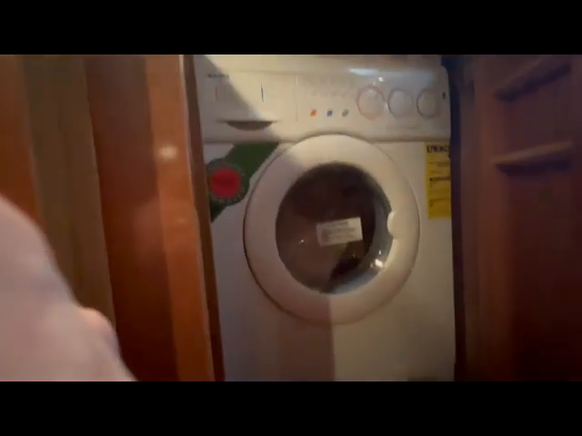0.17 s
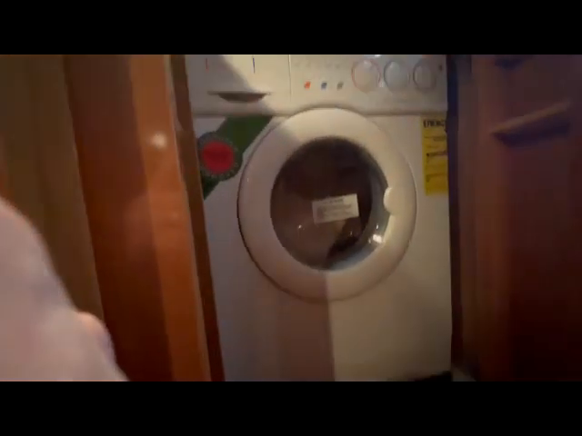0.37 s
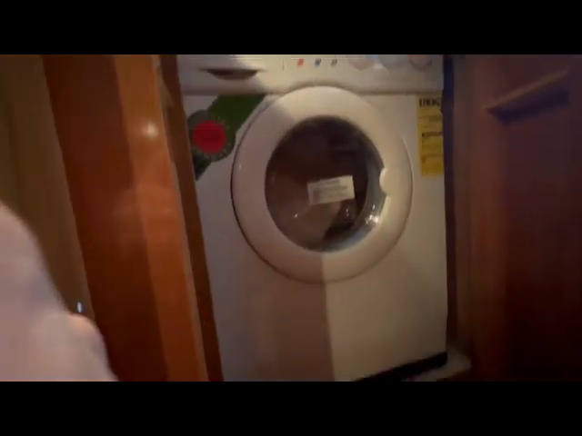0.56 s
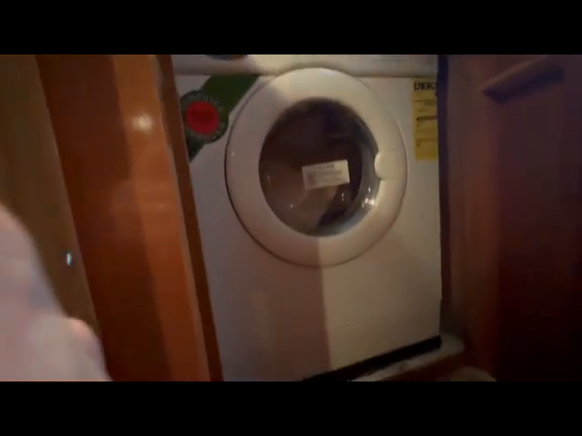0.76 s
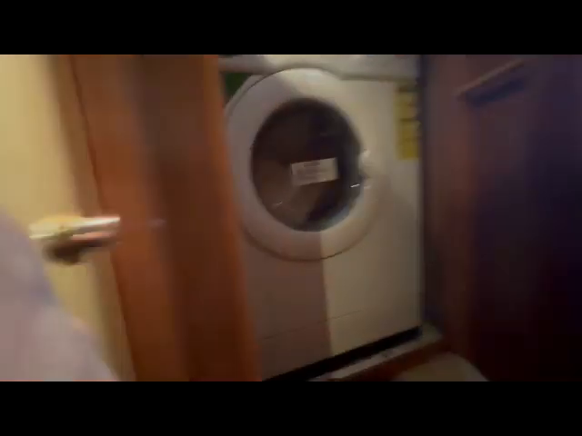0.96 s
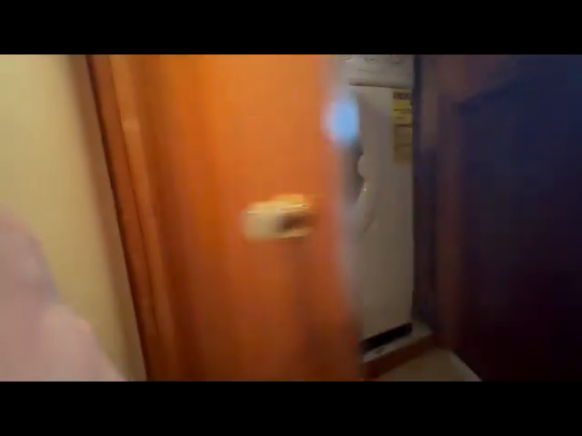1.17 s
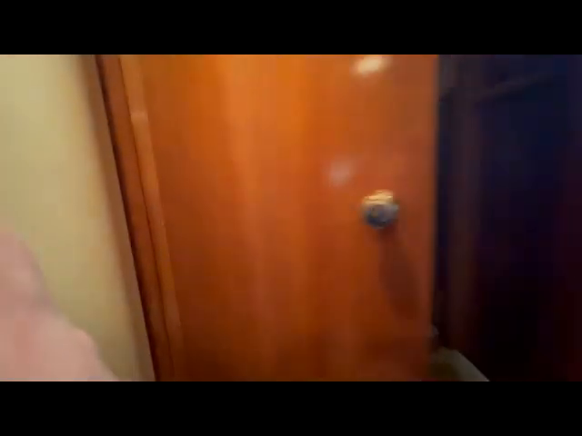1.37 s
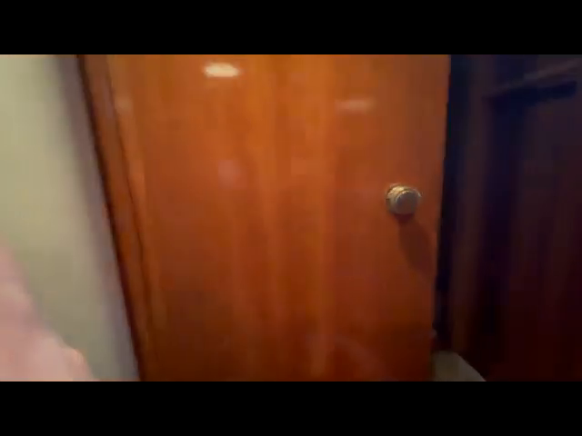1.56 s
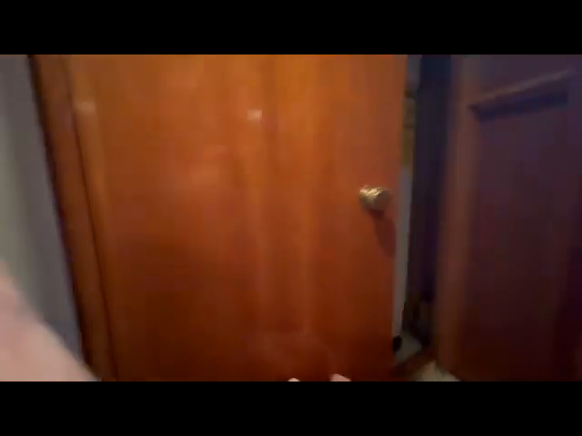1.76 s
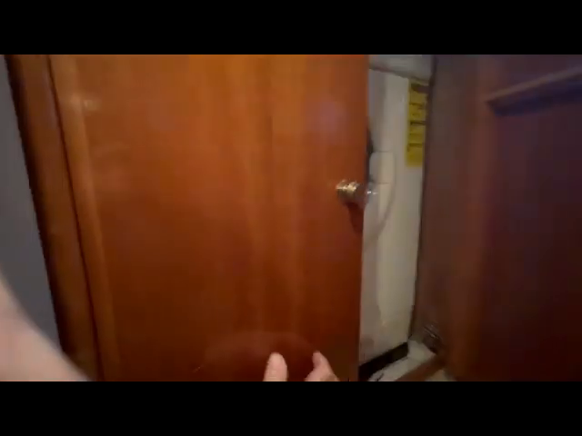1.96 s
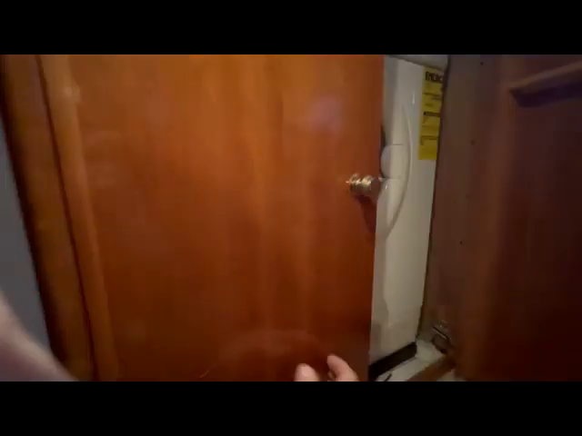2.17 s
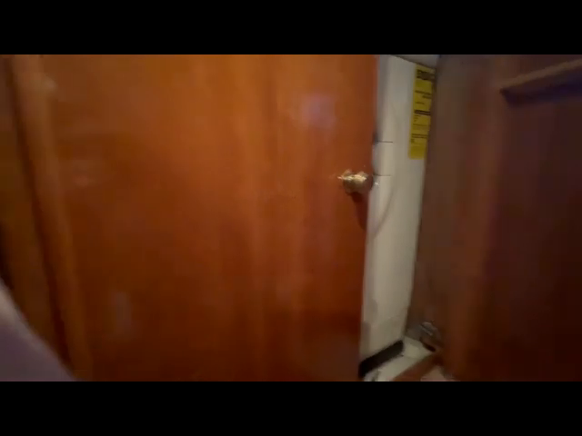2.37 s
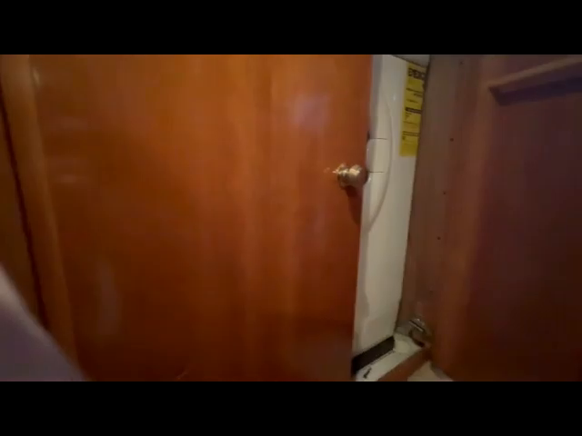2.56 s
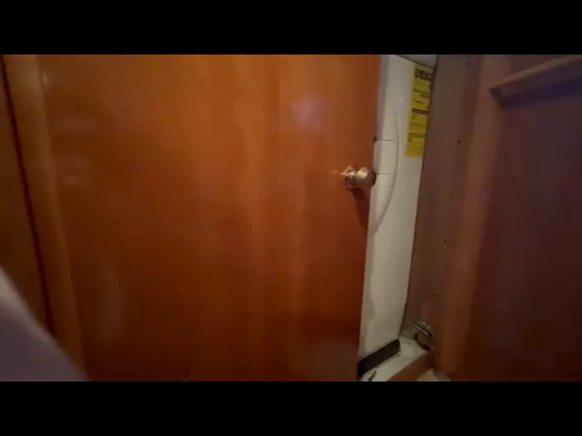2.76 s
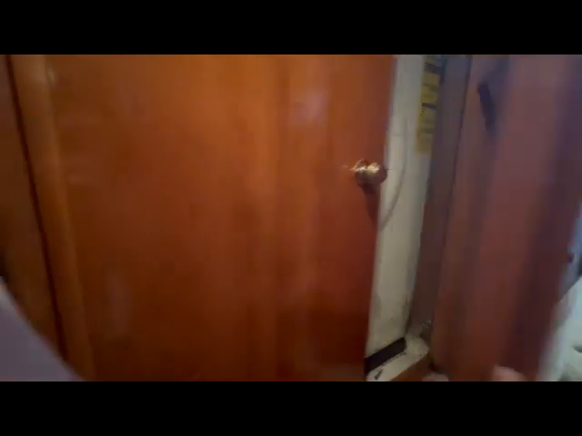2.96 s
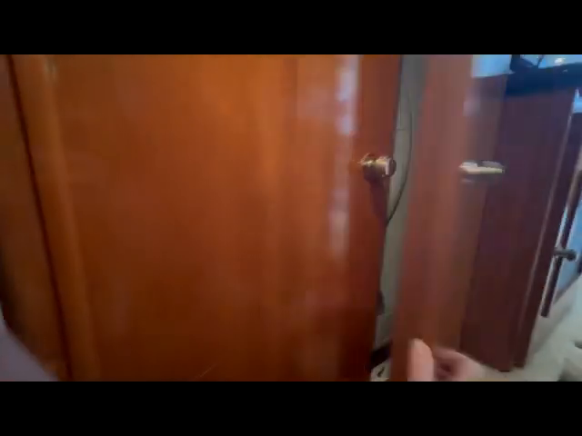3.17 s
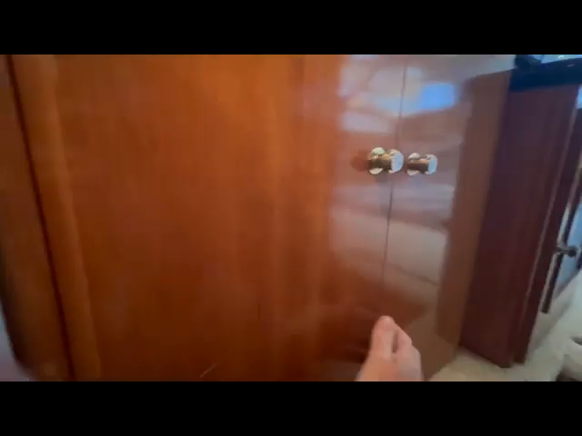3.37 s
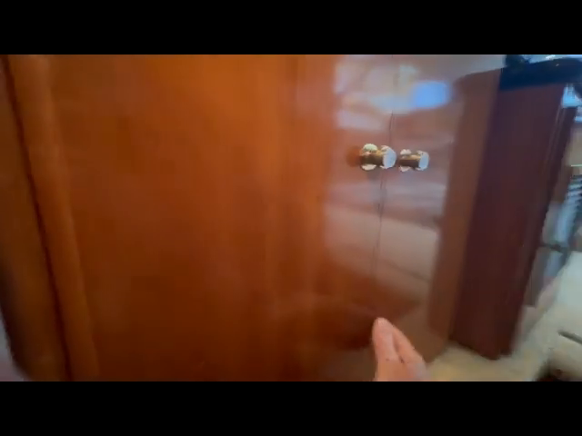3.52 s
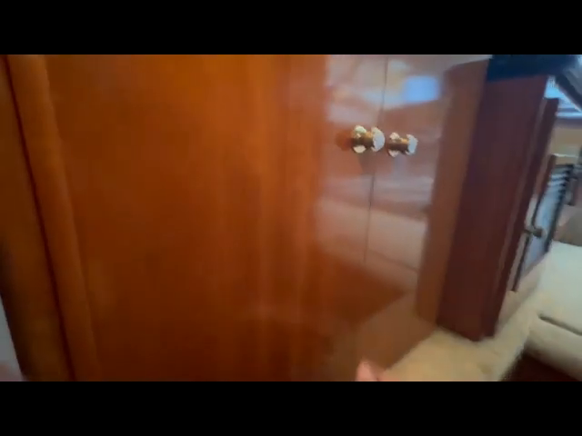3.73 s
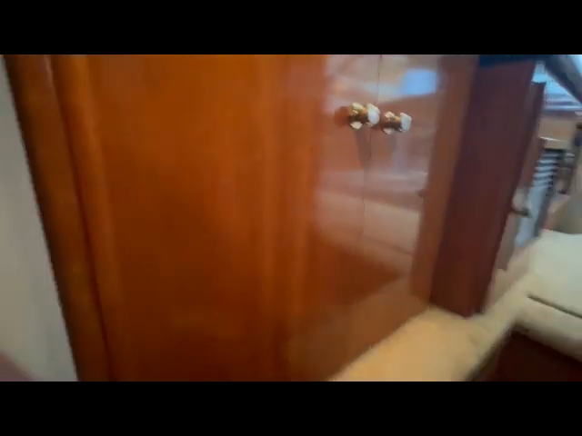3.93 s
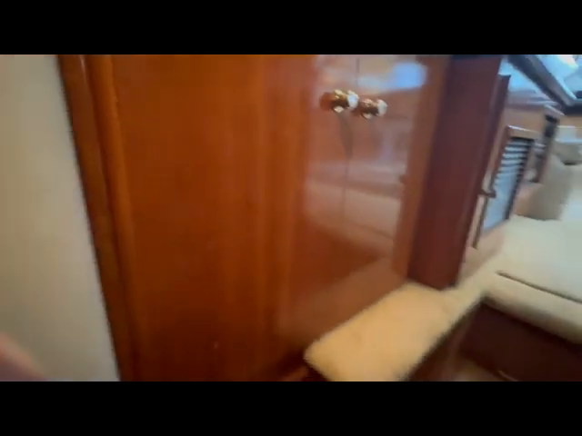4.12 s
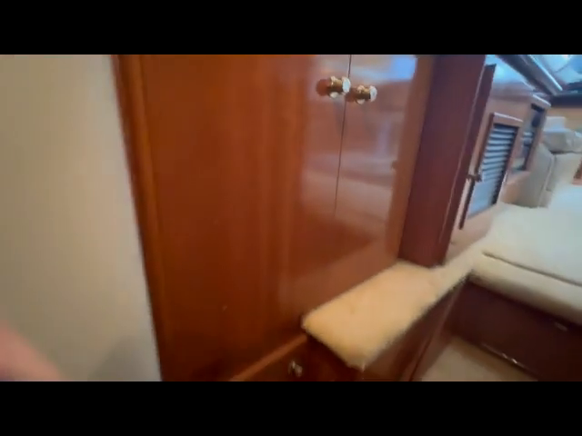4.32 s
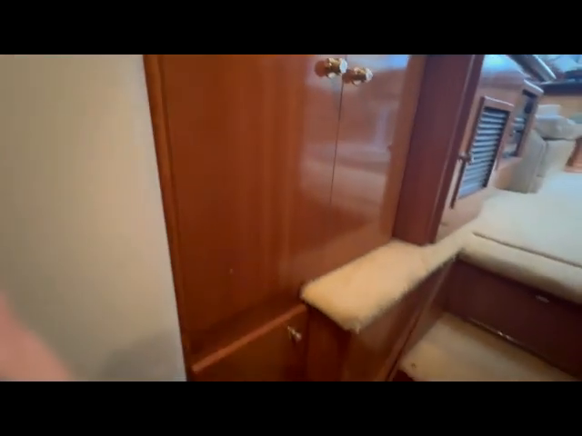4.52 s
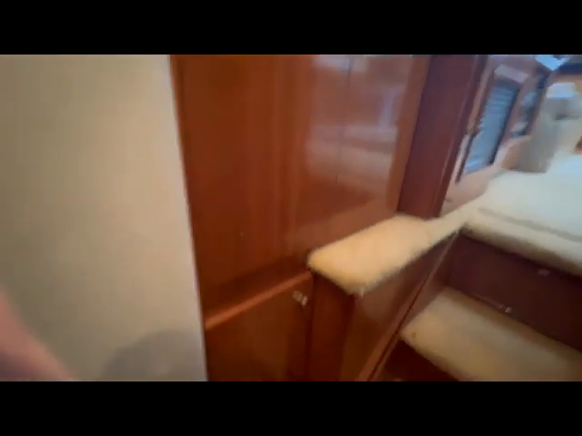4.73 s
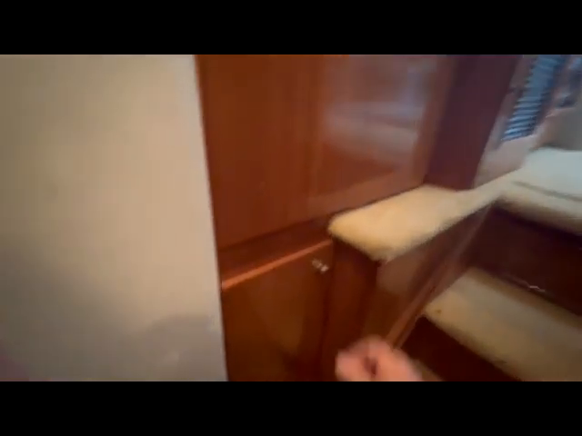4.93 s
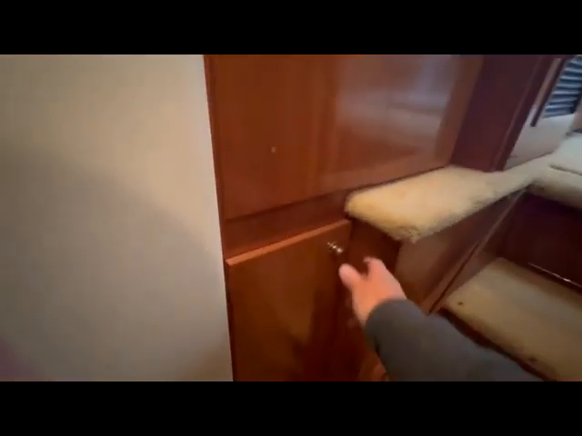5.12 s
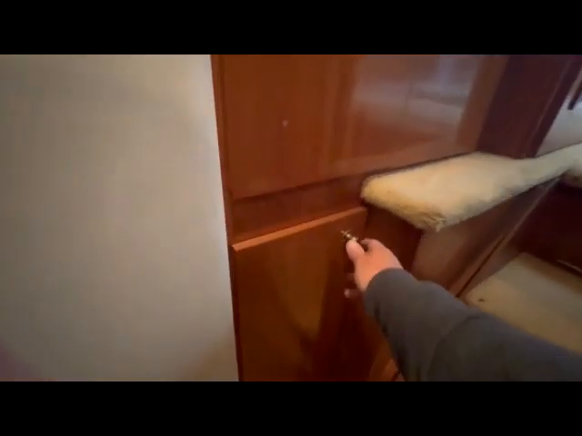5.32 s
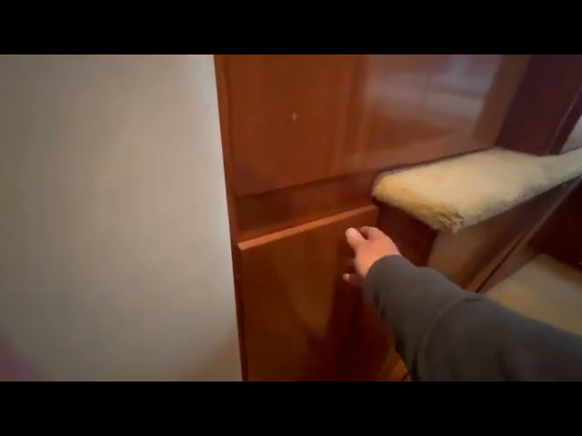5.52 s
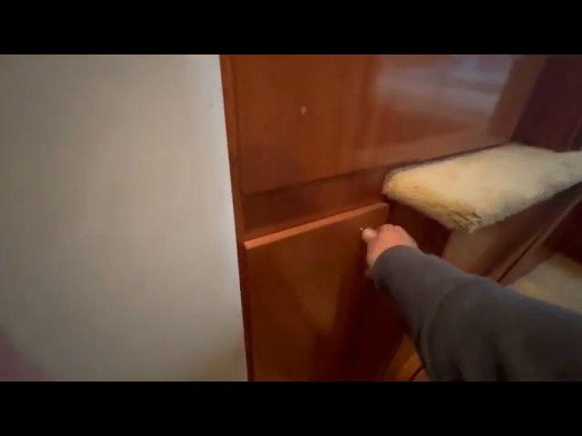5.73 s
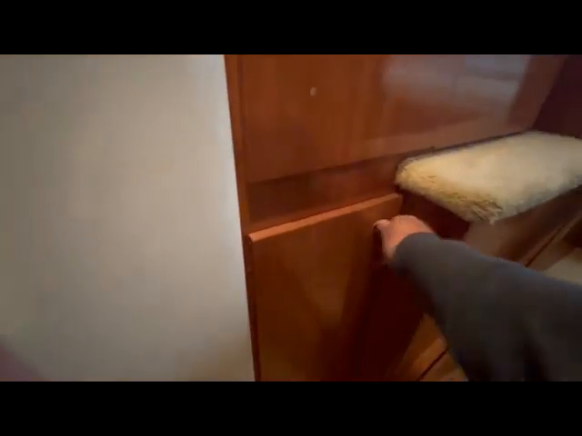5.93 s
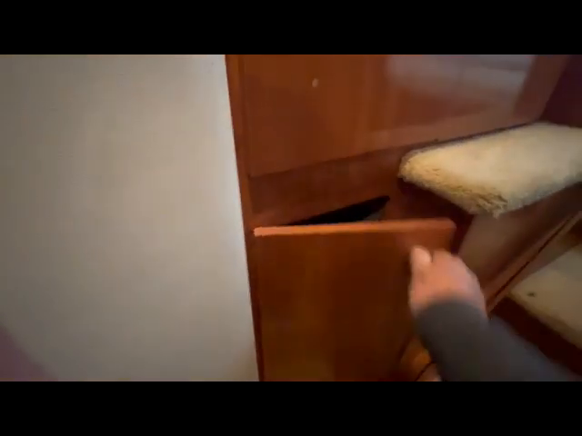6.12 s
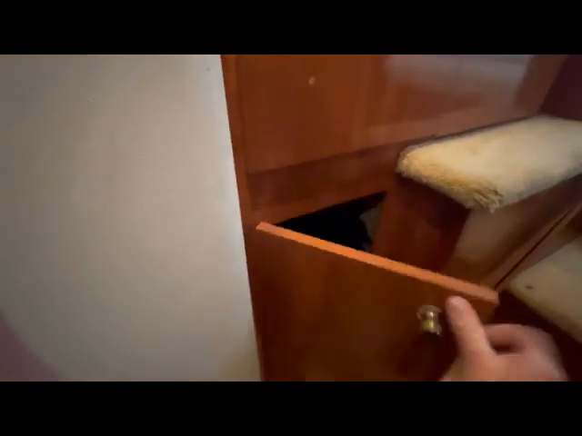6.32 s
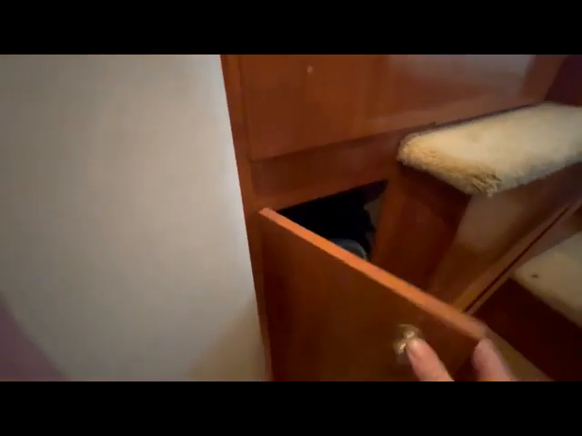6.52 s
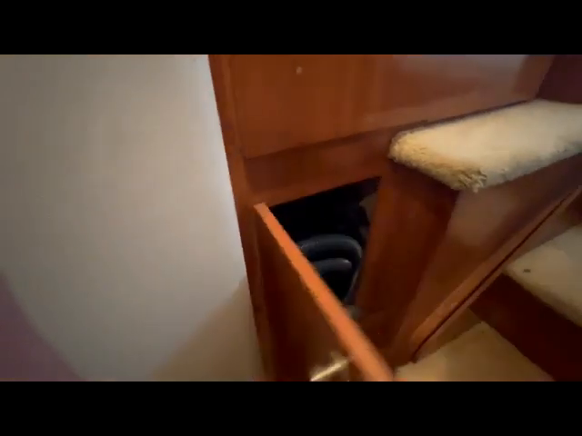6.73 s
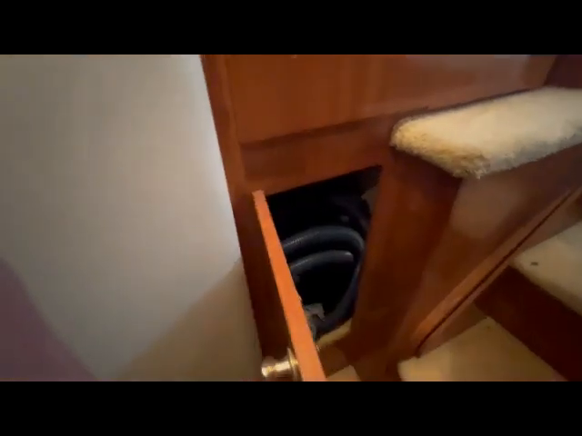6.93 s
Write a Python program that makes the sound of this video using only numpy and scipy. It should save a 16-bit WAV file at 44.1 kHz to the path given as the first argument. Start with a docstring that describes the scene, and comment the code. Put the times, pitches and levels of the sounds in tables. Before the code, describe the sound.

Close wooden doors bang shut one after another, then a small door unlatches with a loud clack and hollow knocks, over faint hiss.

```python
"""Locker doors in a boat cabin

Close by, on a stereo microphone, two tall wooden doors are swung shut, then a low one is unlatched
and opened. Each contact is a latch click, a knock in the panel and a thud in the cabinet; cabin and
hull ring on. Faint ventilation hiss, a treble rustle and a low hull rumble make the room tone."""
import sys
import numpy as np
from scipy import signal
from scipy.fft import rfft, irfft, next_fast_len
from scipy.io import wavfile
from scipy.ndimage import uniform_filter1d

SR = 44100
rng = np.random.default_rng(int(sys.argv[2]) if len(sys.argv) > 2 else 0)


def generate_wav(sig):
    """Save sig (samples, or channels by samples) to the path in sys.argv[1] as 16-bit PCM at SR."""
    pcm = np.round(np.clip(np.atleast_2d(sig).T, -1, 1) * 32767).astype(np.int16)
    wavfile.write(sys.argv[1], SR, pcm)


N = 308259
FFT_SIZE = 2 * next_fast_len(N // 2 + 1)


def door(hits, modes, tap_hz, seated_hz, pan_db, lag_ms):
    """Every contact clicks the latch, knocks the panel and, 8.5 ms later, pumps the cabinet."""
    click, panel, thud = np.zeros((2, N)), np.zeros((2, N)), np.zeros(N)
    for s, click_db, knock_db, thud_db, click_hz, spot_hz, tilt_db, seated in hits:
        hardness = np.interp(click_db, [-32, -22], [0, 1])  # loud clicks are hard, short contacts
        contact_s = np.interp(hardness, [0, 1], [.0095, .0042])
        place_db = pan_db + 3 * rng.standard_normal()  # each lands elsewhere on the door
        sides = gain_of([[place_db / 2], [-place_db / 2]])
        add(click, s, gain_of(click_db) * sides * latch_click(click_hz, tilt_db, hardness, contact_s))
        add(panel, s, gain_of(knock_db) * sides * panel_knock(modes, spot_hz, hardness, contact_s))
        add(thud, s + .0085, gain_of(thud_db) * cabinet_thud(modes, seated_hz if seated else tap_hz))
    # the panel reaches the left of the microphone lag_ms ahead of the right
    shift = np.exp(1j * np.pi * np.fft.rfftfreq(FFT_SIZE, 1 / SR) * lag_ms / 1000)
    return click + thud + irfft(rfft(panel, FFT_SIZE) * [shift, 1 / shift], FFT_SIZE)[:, :N]


def slam(chatter, seated_s, click_db, knock_db, thud_db, click_hz, seated_spot_hz,
         rise_db_per_ms, snap_db, snap_hz, snap_tilt_db, gap_ms):
    """The contacts of a slam: the latch chatters in and snaps home, then the door bounces twice."""
    # rebounds, re the slam: click/dB, knock/dB, thud/dB
    bounces = [(-9, -3.5, -2.58), (-14.5, 0.65, -3.5)]
    chatter_tilt_db, bounce_tilt_db, bounce_hz = -2.5, -8.5, 1700
    hits = []
    for s, click, knock, spot_hz in chatter:
        early_thud_db = thud_db - rise_db_per_ms * (seated_s - s) * 1000
        hits.append((s, click_db + click, knock_db + knock, early_thud_db,
                     click_hz, spot_hz, chatter_tilt_db, False))
    hits.append((seated_s, click_db + snap_db, knock_db, thud_db,
                 snap_hz, seated_spot_hz, snap_tilt_db, True))
    for k, (click, knock, thud) in enumerate(bounces, 1):
        hits.append((seated_s + k * gap_ms / 1000, click_db + click, knock_db + knock, thud_db + thud,
                     bounce_hz, seated_spot_hz, bounce_tilt_db, True))
    return hits


def latch_click(hz, tilt_db, hardness, contact_s, size=2048):
    """A burst of rattle and a brief ring of the latch's metal parts; tilt_db is per octave."""
    # rattle spectrum: f/Hz, level/dB
    rattle_spectrum = [(600, -9), (1200, -1.5), (2020, -5), (3080, -10), (3850, -8.5), (7560, -16),
                       (8300, -8.5), (10800, -24.5), (12000, -16.5), (14600, -23), (16500, -40.5)]
    # modes of the metal: f/Hz, level/dB, t60/s
    metal_modes = [(1786, -4.5, 0.011), (2103, -3, 0.018), (2330, -4, 0.01), (2521, -3.5, 0.016),
                   (2864, -3, 0.031), (3200, -8.5, 0.013), (3860, -0.5, 0.011), (4290, -4, 0.014),
                   (4800, -6.5, 0.018), (5700, -5.5, 0.024), (6210, -5.5, 0.045), (6700, -10, .012),
                   (8100, -8, 0.0092), (8900, -10.5, 0.026), (13500, -7.5, .006)]
    t, bins = np.arange(size) / SR, np.fft.rfftfreq(size, 1 / SR)
    force = (2 * t / contact_s) ** 2 * np.exp(2 - 4 * t / contact_s)
    tongue = 0.5 / (1 + (5.9 * (bins - hz) / hz) ** 2)  # resonance of the latch tongue
    tilt = gain_of(tilt_db * np.log2(np.maximum(bins / 1500, 1)))
    colour = (gain_of(at_pitch(rattle_spectrum, bins)) + tongue) * tilt
    rattle = unit_rms(irfft(rfft(rng.standard_normal((2, size))) * colour))
    detuned = metal_modes * np.array([1 + 0.028 * rng.uniform(-1, 1), 1, 1])
    clack = ring(detuned, hz, .3, rng.random(len(detuned)), min(tilt_db, 0), size=size)
    clack *= 1 - np.exp(-t / 0.00029)
    return force * rattle + gain_of(np.interp(hardness, [0, 1], [-2.5, 3])) * clack


def panel_knock(modes, spot_hz, hardness, contact_s):
    """The modes above 140 Hz, damped and detuned by hand and frame; light contacts sound duller."""
    hz, db, t60 = np.transpose([mode for mode in modes if mode[0] > 140])
    detune = 1 + .03 * rng.uniform(-1, 1, len(hz))
    ring_share = np.interp(hardness, [0, 1], [1.05, .75]) / np.hypot(1, hz / 1100)
    tilt_db, focus_db = np.interp(hardness, [0, 1], [-3, 0]), np.interp(hardness, [0, 1], [15, 9.5])
    held = np.c_[hz * detune, db, t60 * ring_share]
    t = np.arange(SR // 8) / SR
    knock = ring(held, spot_hz, 0.32, rng.random(len(modes)), tilt_db, focus_db, size=len(t))
    return knock * (1 - np.exp(-4 * t / contact_s)) ** 2


def cabinet_thud(modes, hz):
    """The air in the cabinet is squeezed slowly and booms in the modes up to 140 Hz."""
    lows = [mode for mode in modes if mode[0] <= 140]
    push = np.hanning(round(0.0064 * SR))
    return np.convolve(ring(lows, hz, 0.17, np.arange(len(lows)) / 2), push / push.sum())


def hollow_locker():
    """The low locker rings hollow as its door moves: three long notes over a slow boom."""
    # jolts of the locker: t/s, high note/dB, middle notes/dB, boom/dB
    jolts = [(6.291, -44, -41, -58), (6.333, -39.5, -43.5, -52), (6.494, -34, -37.5, -28),
             (6.576, -72, -58, -31.5), (6.86, -67.5, -49.5, -35)]
    # its middle notes: f/Hz, t60/s
    middle_modes = [(165, 0.15), (252, 0.19)]
    s, high_db, middle_db, boom_db = np.transpose(jolts)
    high = struck_mode(zip(s, high_db), hz=415, t60=.34, swell_s=.0019)
    middle = sum(struck_mode(zip(s, middle_db), *mode, swell_s=.0035) for mode in middle_modes)
    boom = struck_mode(zip(s, boom_db), hz=83.2, t60=.21, swell_s=.013)
    return high + middle + boom


def knobs():
    """Fingers catch the metal knobs, which ring a little left of the microphone."""
    # finger taps: t/s, level/dB
    taps = [(.883, -47.5), (.933, -29)]
    # close, beating notes: f/Hz, t60/s
    modes = [(1482, 0.064), (1520, 0.042)]
    return gain_of([[1.5], [-1.5]]) * sum(struck_mode(taps, *mode, swell_s=.0042) for mode in modes)


def hinge_ticks():
    """Hinge and catch give small metal ticks that die by 60 dB in 90 cycles."""
    # ticks: t/s, level/dB, f/Hz
    ticks = [(1.391, -58, 2350), (1.398, -48.5, 2330), (1.439, -61, 2320), (1.451, -64, 2280),
             (2.739, -56, 6200), (2.757, -53, 6400), (2.783, -61, 4350), (2.856, -59, 4730),
             (3.896, -63.5, 4620), (3.896, -69, 5800), (5.945, -33, 8050), (6.32, -49, 1714)]
    return sum(struck_mode([(s, db)], hz, t60=90 / hz, swell_s=.001) for s, db, hz in ticks)


def noise_swells():
    """Soft scrapes around the doors, and two brief swells of hiss before the low door's latch cracks."""
    # swells: start/s, loudest/s, end/s, level/dB, dull part re level/dB
    swells = [(0.946, 0.95, 1.2, -62.5, 1.5), (1.059, 1.161, 1.235, -53.5, -10),
              (1.406, 1.414, 1.62, -62, -8), (2.56, 2.583, 2.64, -54, -3.5),
              (2.724, 2.738, 2.82, -56.5, -1), (2.989, 3.022, 3.14, -67, -11),
              (3.091, 3.154, 3.22, -57, -3.5), (3.221, 3.251, 3.278, -65, 12.5),
              (3.716, 3.905, 3.92, -73.5, 3.5), (5.885, 5.935, 5.94, -51, 3),
              (5.968, 5.969, 5.984, -45, 1.5), (6.077, 6.2, 6.3, -73, 7.5),
              (6.281, 6.312, 6.38, -48.5, -10)]
    # spectra of the bright and the dull part: f/Hz, level/dB
    bright_spectrum = [(590, -46.5), (1000, -12), (1680, 0), (2270, -2.5), (3080, -12.5), (3990, -12.5),
                       (7610, -18), (8460, -17.5), (14700, -29.5), (16500, -56.5)]
    dull_spectrum = [(120, -28), (300, -6.5), (430, -8), (510, 3.5), (590, -5), (700, 2.5), (860, -6),
                     (1050, 1), (1250, -11), (1800, -16.5), (4000, -56)]
    out = np.zeros((2, N))
    for start, loudest, end, level_db, dull_db in swells:
        size = round((end - start) * SR / 256) * 256
        t = start + np.arange(size) / SR
        swell_db = np.interp(t, [start, loudest, end], [-18.5, 0, -18.5])
        grain_db = 2 * unit_rms(uniform_filter1d(rng.standard_normal(size), 150))
        dull = gain_of(dull_db) * stereo_noise(dull_spectrum, size, likeness=.24)
        bright = stereo_noise(bright_spectrum, size, likeness=.031)
        envelope = gain_of(level_db + swell_db + grain_db) * signal.windows.tukey(size, .2)
        add(out, start, envelope * (bright + dull))
    return out


def cabin(sound):
    """Cabin and hull ring on, dying band by band; a larger space beyond adds a longer, fainter tail."""
    # diffuse tail: f/Hz, t60/s, level/dB, left-right likeness/0-1
    bands = [(47.87, 0.24, -12, 0.98), (120, 0.65, -13.5, 0.93), (248, 0.11, -12.5, 0.93),
             (370, 0.13, -7.5, 0.17), (700, 0.077, -5.5, 0.069), (1210, 0.054, -8.5, 0.063),
             (2920, 0.13, -14, .05), (8100, 0.077, -10, .05), (13940, 0.037, -14, .05)]
    beyond_db, beyond_stretch = -12.5, 3.1
    hz, t, (left, other) = signal.stft(rng.standard_normal((2, SR)), SR, nperseg=512)
    t60, level_db, likeness = (at_pitch(bands, hz, column)[:, None] for column in (1, 2, 3))
    spectra = np.array([left, likeness * left + np.sqrt(1 - likeness ** 2) * other])
    decay = gain_of(-60 * t / t60) + gain_of(beyond_db - 60 * t / (t60 * beyond_stretch))
    spectra *= gain_of(level_db) * decay / np.sqrt(t60 * SR / np.log(1e6))
    treble = np.clip(hz / 2500, 0, 1)[:, None]
    spectra *= gain_of(3 * patches(left.shape, 3, 7) * treble)  # panels and fittings ring unevenly
    tail = signal.istft(spectra, SR, nperseg=512)[1]
    tail *= np.clip(np.arange(tail.shape[1]) / SR / 0.007 - .5, 0, 1)  # walls answer after a few ms
    return signal.fftconvolve(sound, tail, axes=1)[:, :N]


def hull_rumble(lumps_db):
    """Deep, lumpy noise from the hull that swells around the door movements."""
    # rumble level: t/s, level/dB
    levels = [(0.0, -70.5), (0.6, -73.5), (0.95, -64), (1.2, -63.5), (1.37, -88), (1.68, -66.5),
              (1.74, -59), (1.92, -62.5), (2.12, -45), (2.43, -58.5), (2.69, -50), (3.11, -65.5),
              (3.4, -53), (3.99, -64), (5.0, -73), (5.95, -66), (6.05, -36), (6.22, -59.5), (6.99, -73)]
    # rumble spectrum: f/Hz, level/dB
    spectrum = [(8.8, -66), (15, -36.5), (36, -8.5), (54, -2), (72, -4.5), (87, -10.5), (120, -9),
                (166, -16.5), (300, -21.5), (390, -50.5), (660, -120)]
    return level_curve(levels, lumps_db) * stereo_noise(spectrum, FFT_SIZE, likeness=.35)[:, :N]


def rustle():
    """A faint, drifting rustle whose treble flickers in patches."""
    # rustle level: t/s, level/dB
    levels = [(0.0, -81.5), (1.21, -81.5), (1.93, -75.5), (2.06, -58.5), (2.25, -77.5), (2.67, -74.5),
              (3.1, -76.5), (3.35, -69.5), (3.89, -81), (4.3, -79), (4.42, -84), (4.65, -85), (4.79, -73.5),
              (5.08, -71), (5.3, -73), (5.37, -78), (5.55, -78.5), (5.65, -76), (5.84, -73.5), (6.2, -72),
              (6.44, -74.5), (6.7, -69), (6.85, -73), (6.99, -78)]
    # rustle spectrum: f/Hz, level/dB
    spectrum = [(180, -37.5), (300, -2), (343, -19), (427, -0.5), (531, -11), (1170, -1.5), (7500, -9),
                (8600, -4.5), (10500, -17.5), (12500, -17), (14800, -22.5), (16500, -30)]
    flicker_db = 1.3 * wander(1500)
    hz, _, spectra = signal.stft(stereo_noise(spectrum, FFT_SIZE, likeness=.017), SR, nperseg=512)
    treble = np.clip(hz / 12000, 0, 1)[:, None]
    patch_db = 2.5 * np.sqrt(treble) * patches(spectra.shape[1:], 8, 10)
    crackle_db = .85 * treble * patches(spectra.shape[1:], 60, 3)
    hiss = signal.istft(spectra * gain_of(patch_db + crackle_db), SR, nperseg=512)[1][:, :N]
    return level_curve(levels, flicker_db) * unit_rms(hiss)


def vent_hiss(waver_db):
    """The ventilation hisses softly, wide around the microphone."""
    # hiss level: t/s, level/dB
    levels = [(0.0, -74.5), (1.2, -72.5), (3.1, -72), (3.5, -78), (4.4, -77.5), (5.3, -79.5), (5.9, -73),
              (6.5, -70), (6.99, -74)]
    # hiss spectrum: f/Hz, level/dB
    spectrum = [(88, -40), (150, -17.5), (201, -9.5), (236, -20.5), (349, -9.5), (442, -9), (738, -12.5),
                (898, -15), (1090, -12), (1450, -13), (1700, -5.5), (1950, -0.5), (2200, -9.5), (2600, -22),
                (5270, -39), (6940, -27.5), (16500, -45)]
    return level_curve(levels, waver_db) * stereo_noise(spectrum, FFT_SIZE, likeness=.011)[:, :N]


def ring(modes, spot_hz, reach_octaves, phases, tilt_db=0., focus_db=9, size=SR // 3):
    """Dying modes (t60 at least 10 ms), up to focus_db weaker away from spot_hz, tilted above; peak 1."""
    hz, db, t60 = np.transpose(modes)[:, :, None]
    t = np.arange(size) / SR
    octaves = np.log2(hz / spot_hz)
    db = db - focus_db * (1 - np.exp(-(octaves / reach_octaves) ** 2)) + tilt_db * np.maximum(octaves, 0)
    envelopes = gain_of(db - 60 * t / np.maximum(t60, .01))
    wave = (envelopes * np.sin(2 * np.pi * (hz * t + phases[:len(hz), None]))).sum(0)
    return wave / abs(wave).max()


def struck_mode(taps, hz, t60, swell_s):
    """One mode that swells and dies at each tap (t/s, level/dB)."""
    out, t = np.zeros(N), np.arange(SR // 2) / SR
    wave = np.sin(2 * np.pi * hz * t) * gain_of(-60 * t / t60) * (1 - np.exp(-t / swell_s))
    for s, db in taps:
        add(out, s, gain_of(db) * wave)
    return out


def stereo_noise(spectrum, size, likeness):
    """Coloured noise with a given left-right correlation; rms 1."""
    left, other = rng.standard_normal((2, size))
    pair = np.array([left, likeness * left + np.sqrt(1 - likeness ** 2) * other])
    colour = gain_of(at_pitch(spectrum, np.fft.rfftfreq(size, 1 / SR)))
    return unit_rms(irfft(rfft(pair) * colour, size))


def patches(shape, bins, frames):
    """A random field over pitch and time, smooth over so many bins and frames; rms 1."""
    field = rng.standard_normal(shape[::-1]).T
    return unit_rms(uniform_filter1d(uniform_filter1d(field, bins, 0), frames, 1))


def wander(samples):
    """A random drift, smooth over so many samples; rms 1."""
    return unit_rms(uniform_filter1d(uniform_filter1d(rng.standard_normal(N), samples), samples))


def level_curve(levels, waver_db):
    """Gain that follows points (t/s, level/dB), with a waver on top."""
    return gain_of(np.interp(np.arange(N) / SR, *np.transpose(levels)) + waver_db)


def at_pitch(points, hz, column=1):
    """Reads one column of a table on a log-frequency axis."""
    table = np.transpose(points)
    return np.interp(np.log(hz + 1), np.log(table[0] + 1), table[column])


def gain_of(db):
    """dB to gain."""
    return 10 ** (np.asarray(db) / 20)


def unit_rms(x):
    """Scales to rms 1."""
    return x / np.sqrt(np.mean(x ** 2) + 1e-20)


def add(mix, s, sound):
    """Mixes a sound in at s seconds."""
    part = mix[..., round(s * SR):][..., :sound.shape[-1]]
    part += sound[..., :part.shape[-1]]


def scene():
    """Three doors in turn over the room tone; the cabin answers each door by its own amount."""
    # modes of each door with its cabinet: f/Hz, level/dB, t60/s
    left_door = [(62.99, -2, 0.13), (111.4, -1.5, 0.14), (165, -0.5, 0.082), (231, 0, 0.049),
                 (258, -4, 0.049), (290, 2, 0.035), (355, -4.5, 0.055), (402, -5.5, 0.06), (500, -3, 0.055),
                 (672, -9, 0.1), (747, -2.5, 0.069), (872, -3, 0.065), (1023, -7, 0.069),
                 (1270, -6.5, 0.024), (1500, -7.5, 0.062)]
    right_door = [(58, -3, 0.24), (121.8, -2.5, 0.053), (152.5, 8, 0.037), (202, -.5, 0.1),
                  (275, 1.5, 0.051), (377, -4.5, 0.1), (440, -1, 0.0598), (535, -6.5, 0.053),
                  (660, -4, 0.075), (860, -9.5, 0.09), (1040, -9, 0.11), (1184.4, -3, 0.11),
                  (1370, -7.5, 0.064)]
    low_door = [(67, -5.5, 0.23), (115.7, -2.5, 0.15), (170, -9, 0.15), (207.6, 0, 0.099),
                (237.7, 1, 0.069), (290, -0.5, 0.074), (342.6, 3, 0.071), (422.5, 4, 0.07),
                (510, 0.5, 0.076), (610.3, 8.5, 0.051), (734, 7.5, 0.058), (807, 4.5, 0.06),
                (954, 7.5, 0.046), (1128, -7, 0.15)]
    # those three doors: tap thud/Hz, seated thud/Hz, leftward pan/dB, panel lag/ms, cabin share/dB
    doors = [(112, 41, 2.5, .13, 2.5), (70, 58, 1.64, -.2, 3.5), (88.4, 92, 0.5, 0.24, -0.5)]
    # contacts of hand, knob and latch:
    # t/s, click/dB, knock/dB, thud/dB, click/Hz, struck spot/Hz, click tilt/dB per octave
    taps = [(0.108, -71, -62, -85, 1100, 900, -8), (0.814, -65, -57.5, -82, 1920, 630, -7),
            (0.883, -59.5, -41.5, -59.5, 1480, 585, 0.5), (0.931, -42.5, -36, -47, 1500, 530, -1),
            (.946, -52, -38.5, -45, 1500, 500, -8), (.957, -54, -38.5, -49, 1500, 810, -5.5),
            (1.389, -50.5, -38, -44.5, 2330, 258, 5.5), (1.722, -67.5, -42, -43, 1950, 369, -10),
            (1.888, -47.5, -37.5, -58.5, 1930, 1370, -3.5), (1.970, -16.5, -14, -26.5, 4000, 165, -0.5),
            (1.985, -20.5, -28, -41, 4290, 383, 0), (1.988, -14, -7, -28.5, 1870, 284, -6),
            (2.029, -38.5, -20.5, -21.5, 1520, 276, -4), (2.11, -60, -40, -24.5, 1500, 229, -11.5),
            (2.169, -80, -37.5, -31, 1500, 233, -10), (2.235, -71, -42.5, -30, 1883, 231, -8),
            (2.574, -54.5, -56.5, -34, 6130, 165, 7), (2.664, -43.5, -39, -49, 1980, 1040, 1.5),
            (2.669, -39, -22.5, -43.5, 1370, 1370, -2.5), (2.693, -45.5, -33, -37.5, 5840, 290, -9.5),
            (2.738, -59, -50, -34.5, 6620, 215, -3.5), (2.781, -70, -50, -38, 4360, 165, 3),
            (2.975, -67.5, -66.5, -59, 8510, 200.4, 1), (3.243, -61.5, -37.5, -41, 1480, 700, -13),
            (3.273, -29, -34, -32, 2150, 1370, -4.5), (3.316, -32.5, -15.5, -32, 1500, 440, -6.5),
            (3.336, -28.5, -25.5, -39.5, 1780, 300, -2.5), (3.659, -91, -46, -51.5, 1500, 285.5, -50),
            (4.283, -45, -39.5, -47.5, 1897, 1200, 2), (5.378, -72, -80.5, -85.5, 8100, 900, 3.5),
            (5.413, -60.5, -43.5, -47.5, 1300, 898, -10.5), (5.422, -60, -38.5, -38.5, 1480, 320, -10.5),
            (5.435, -61, -45.5, -52.5, 1500, 698, -11.5), (5.450, -55.5, -37.5, -31, 2500, 440, -8.5),
            (5.462, -59.5, -40.5, -38.5, 2150, 1202, -9), (5.473, -70, -33, -31.5, 1500, 278.5, -4.5),
            (5.698, -87.5, -57, -53, 1807, 316, -12), (5.816, -59, -44.5, -54, 1700, 303, -3.5),
            (5.851, -76.5, -42.5, -40, 1906, 334, -26), (5.901, -53, -66.5, -64.5, 1620, 426, 2.5),
            (5.936, -28.5, -19.5, -26.5, 3910, 364, -2), (5.946, -34, -25, -50, 7850, 338, -6),
            (5.977, -33.5, -32.5, -54, 2310, 770, 1.5), (5.981, -20.5, -3, -39, 4290, 904, 0),
            (5.983, -14, -9, -40.5, 2330, 736, 1), (5.989, -22.5, -5.5, -34, 1880, 430, -4),
            (5.995, -34.5, -9.5, -29, 1400, 323, -11), (6.013, -54, -20.5, -21, 1348, 304, -21.5),
            (6.28, -59, -34, -36, 2190, 245, 0), (6.298, -60, -43, -44, 2400, 290, 1),
            (6.315, -41, -34, -38, 1970, 191, -2), (6.328, -53, -30, -45.5, 2500, 172, -5),
            (6.345, -69, -34.5, -43, 1520, 251, -10), (6.476, -55, -56, -42, 2480, 348, -2.5),
            (6.485, -44.5, -33, -21.5, 2480, 388, -8), (6.492, -34, -23.5, -42, 2044, 510, -10.5),
            (6.506, -38.5, -21, -51, 1890, 181, -10.5), (6.581, -79, -40, -50.5, 1696, 190, -22),
            (6.846, -66, -33, -39.5, 1503, 429, -16), (6.928, -59, -45.5, -58.5, 1306, 310, -2.5)]
    # slams of the tall doors: seated/s, click/dB, knock/dB, thud/dB, click/Hz, seated spot/Hz,
    # thud rise/dB per ms, snap re click/dB, snap/Hz, snap tilt/dB per octave, bounce gap/ms
    slams = [(1.982, -20, -5.5, -9, 3707, 278.5, 1.45, 5, 8390, 0, 16.5),
             (3.298, -12.5, -7, -7.5, 1907, 230, 3.5, 1.2, 1930, -2.5, 9.94)]
    # latch chatter before each slam: t/s, click re slam/dB, knock re slam/dB, struck spot/Hz
    chatters = [
        [(1.953, -1.5, -1, 850), (1.959, -5, -7, 869.4), (1.964, 3.5, -2.5, 350), (1.975, -3, -1, 290),
         (1.979, -4, -7, 290)],
        [(3.280, -2, -13, 1150), (3.284, -9, -13, 660), (3.289, 2.5, -7, 500), (3.294, -10, -4, 1200)],
    ]
    next_door_s = (2.5, 5.0)  # the hand moves to the right door, then to the low one
    hits = [tap + (False,) for tap in taps]  # not seated
    for chatter, blow in zip(chatters, slams):
        hits += slam(chatter, *blow)
    direct = to_cabin = noise_swells() + hollow_locker() + knobs() + hinge_ticks()
    for k, modes in enumerate((left_door, right_door, low_door)):
        *settings, cabin_db = doors[k]
        own_hits = [hit for hit in hits if np.searchsorted(next_door_s, hit[0]) == k]
        sound = door(own_hits, modes, *settings)
        direct = direct + sound
        to_cabin = to_cabin + gain_of(cabin_db) * sound
    tail = cabin(to_cabin)
    lumps_db = 4 * wander(3000)  # rumble and vent waver together
    return direct + tail + hull_rumble(lumps_db) + rustle() + vent_hiss(.3 * lumps_db)


def record(dry):
    """The microphone drops the deepest bass, overloads softly on the slams and stops at 16.3 kHz."""
    low_cut = signal.sosfilt(signal.butter(3, 38., "high", fs=SR, output="sos"), dry)
    saturated = .95 * np.tanh(low_cut / .83)
    band_limit = signal.firwin(511, 16300, window=("kaiser", 9), fs=SR)
    return signal.oaconvolve(saturated, band_limit[None], "same")


dry = scene()
out = record(dry)
generate_wav(out)
```